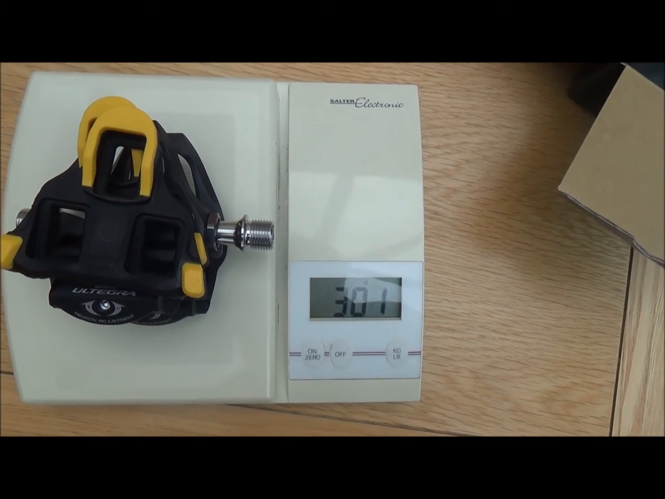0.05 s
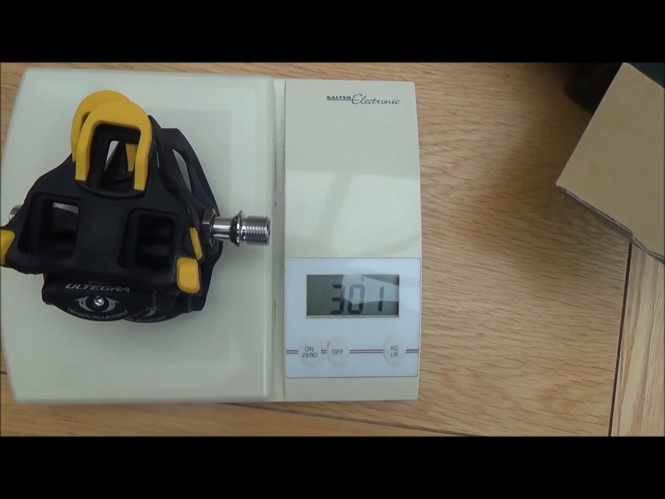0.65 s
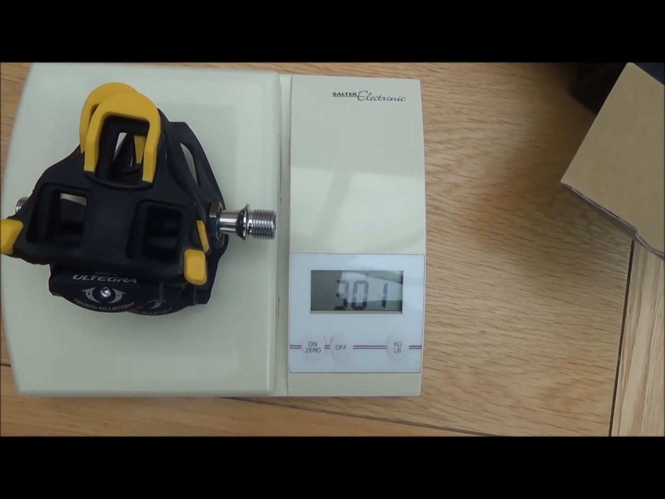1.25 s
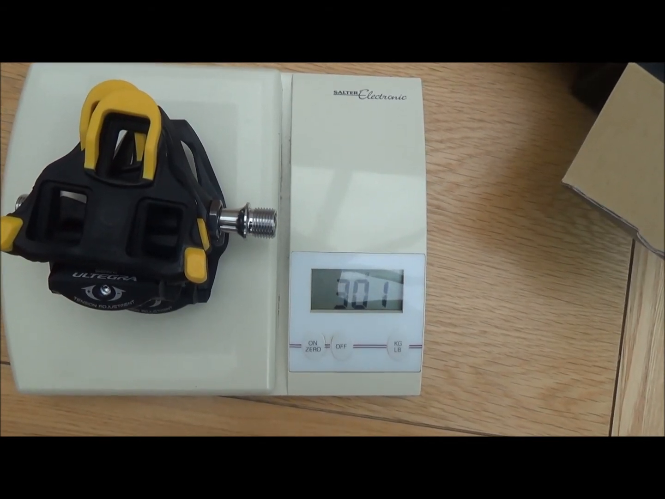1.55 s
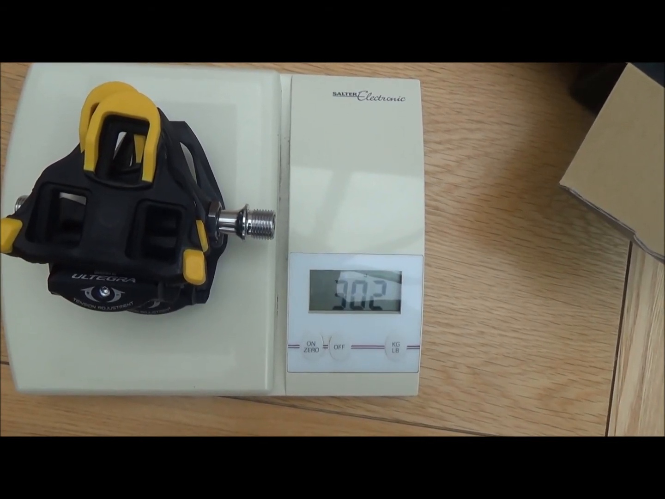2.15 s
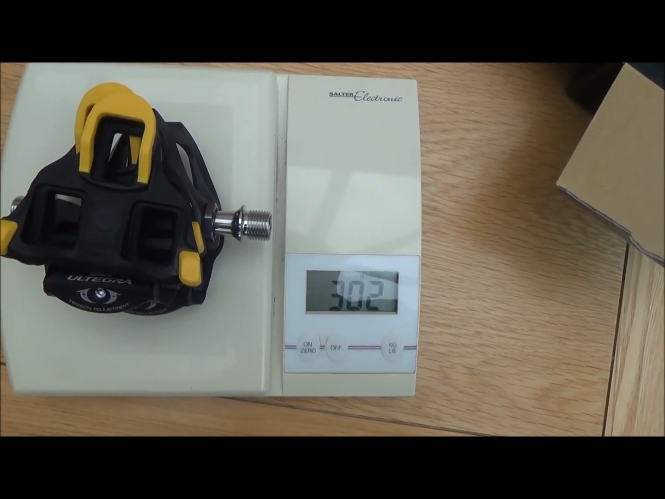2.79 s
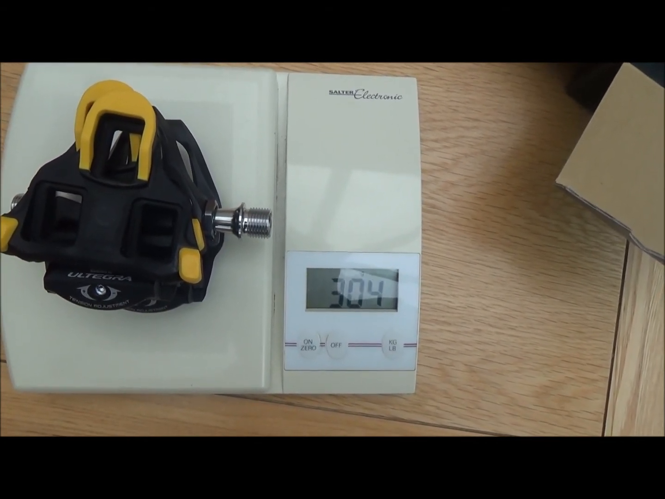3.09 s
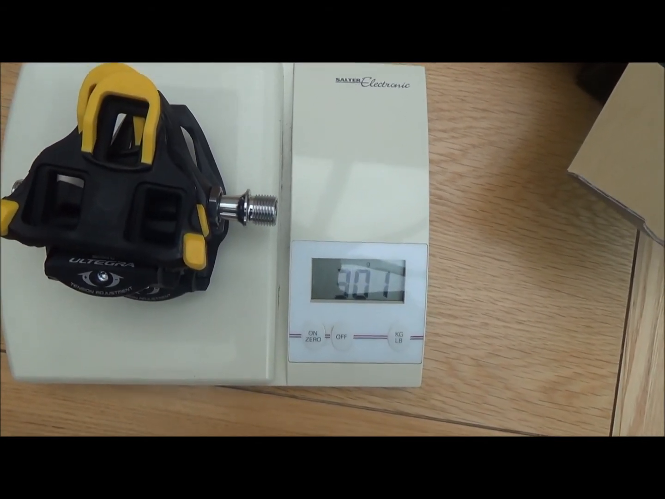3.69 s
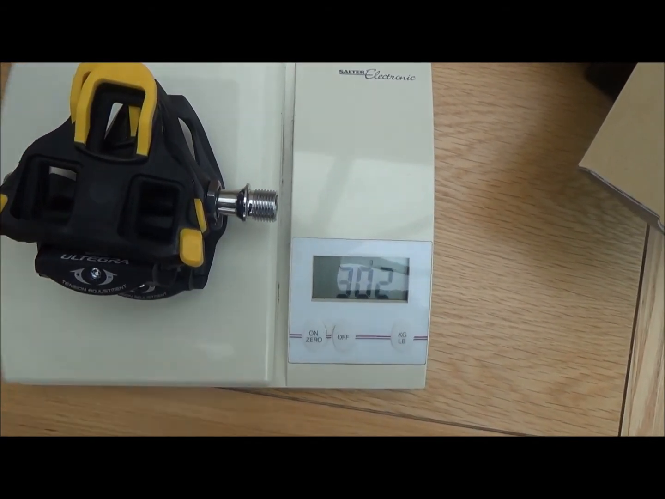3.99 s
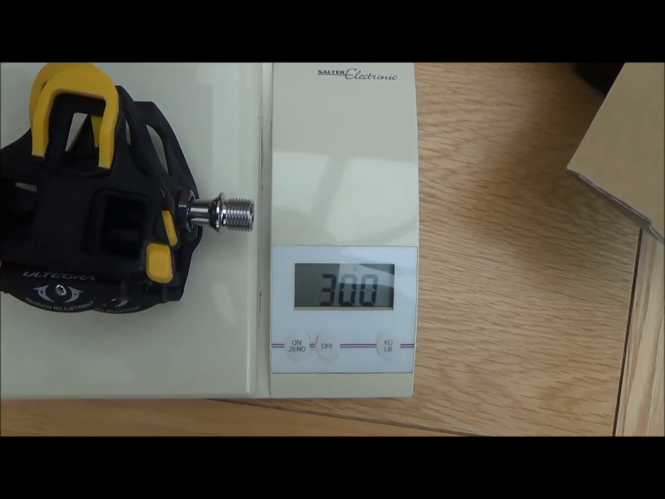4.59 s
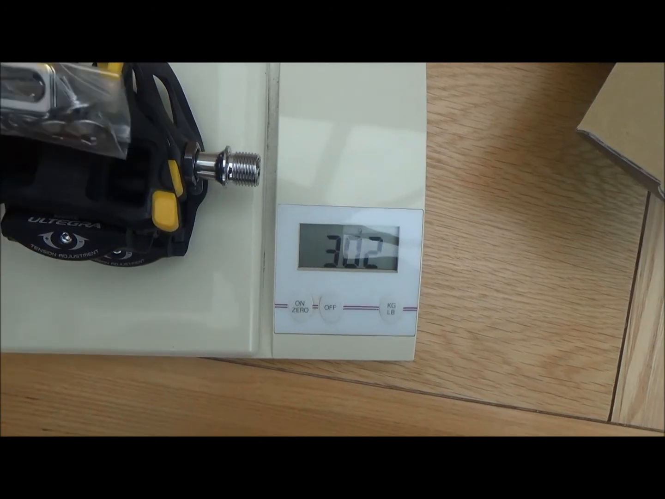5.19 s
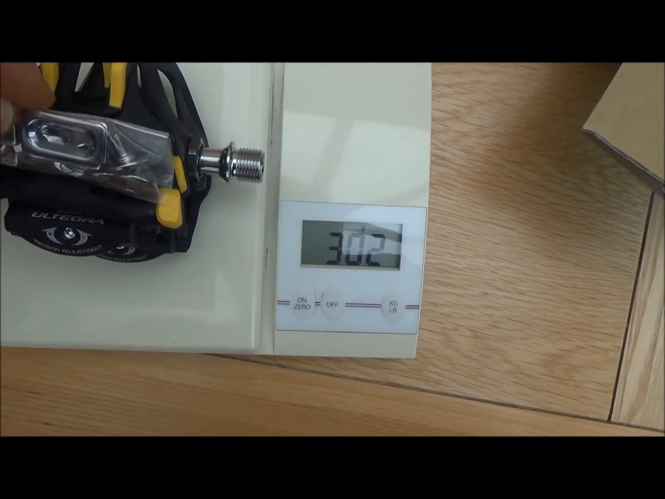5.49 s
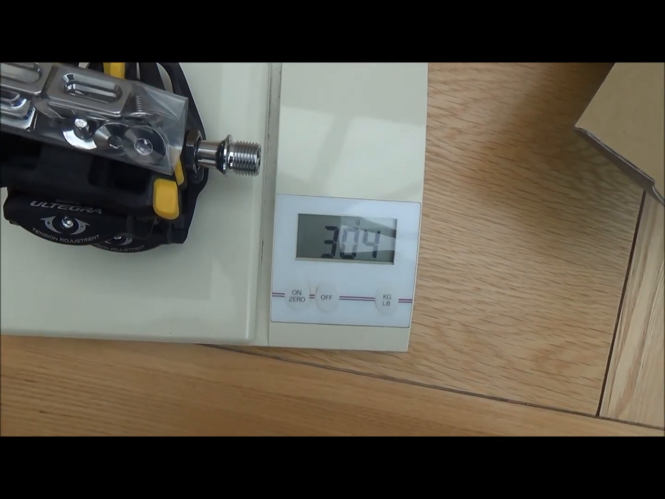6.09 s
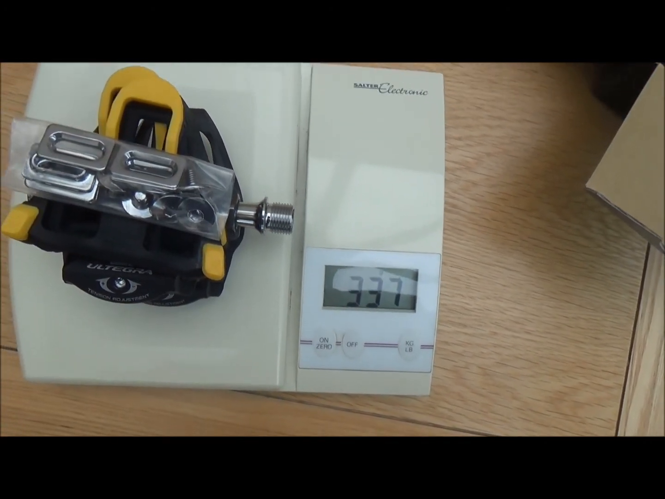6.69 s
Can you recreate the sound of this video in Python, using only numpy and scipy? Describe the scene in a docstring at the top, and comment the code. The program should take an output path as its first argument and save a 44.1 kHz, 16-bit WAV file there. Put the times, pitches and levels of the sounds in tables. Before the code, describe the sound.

Thin plastic rustles and snaps, then lands with light clinks and dull taps, amid camera handling knocks and low room noise.

```python
"""A packet of washers laid on a scale

A small plastic packet of metal cleat washers is lifted from a carton and laid on a pedal on a kitchen
scale. The film slides, snaps and crumples, the washers ring, and fingers rub and knock on the hand-held
camera. Behind is a quiet room with a thin electronic whistle, ducked by gain control after loud crackles."""
import sys
import numpy as np
from scipy import signal
from scipy.fft import rfft, irfft, next_fast_len
from scipy.io import wavfile
from scipy.ndimage import uniform_filter1d

SR = 44100
rng = np.random.default_rng(int(sys.argv[2]) if len(sys.argv) > 2 else 0)


def master_out(mix):
    """Clip the mix to full scale and print it as 16-bit PCM to the path in sys.argv[1]."""
    frames = np.transpose(np.atleast_2d(mix))
    ceiling = np.clip(frames, -1, 1)
    pcm = np.round(ceiling * 32767).astype(np.int16)
    wavfile.write(sys.argv[1], SR, pcm)


N = 302085
TIME = np.arange(N) / SR

# spectrum of rustling film: f/Hz, density/dB
FILM = [(410, -29), (700, -2.5), (1660, -9), (2660, -2.5), (3240, -11), (3690, -1.5), (5060, -6.5),
        (7990, -7), (10500, -3), (14200, -12), (15400, -21), (16000, -42)]
# film sliding under the fingers: start/s, end/s, relative level/dB, tilt/(dB per octave)
SLIDES = [(3.957, 4.34, -55, 1), (4.334, 4.473, -44, -2), (4.869, 5.02, -52, 5), (5.534, 5.62, -48, -3)]


def from_db(db):
    """Decibels to gain."""
    return 10 ** (np.asarray(db) / 20)


def rms_one(x):
    """Scale to unit power."""
    return x / np.sqrt(np.mean(x ** 2) + 1e-20)


def at_hz(points, hz):
    """Read a table on a log-frequency axis."""
    freqs, values = np.transpose(points)
    return np.interp(np.log(hz + 1e-3), np.log(freqs), values)


def cut(x, hz, kind, order=2):
    """Butterworth filter."""
    sos = signal.butter(order, np.clip(hz, 10, .45 * SR), kind, fs=SR, output="sos")
    return signal.sosfilt(sos, x + 1e-18)


def colour(x, spectrum, tilt_db=0):
    """Shape a noise by a spectrum and a tilt per octave, with steep skirts outside it; rms 1."""
    hz = np.fft.rfftfreq(x.shape[-1], 1 / SR) + 1
    inside = np.clip(hz, spectrum[0][0], spectrum[-1][0])
    skirt = np.minimum(hz / inside, inside / hz) ** 6
    shape = from_db(at_hz(spectrum, hz) + tilt_db * np.log2(inside))
    return rms_one(irfft(rfft(x) * skirt * shape, x.shape[-1]))


def diffuse(spectrum):
    """Stereo noise, alike at both microphone ports in the bass and widest in the upper mids."""
    # likeness of left and right: f/Hz, correlation
    likeness = [(50, .9999), (130, 0.99), (250, 1), (500, 0.84), (1000, .83), (2500, 0.36), (6000, 0.71),
                (14000, 1)]
    size = next_fast_len(N)
    mid, side = rfft(rng.standard_normal((2, size)))
    alike = np.clip(at_hz(likeness, np.fft.rfftfreq(size, 1 / SR)), 0, 1)
    stereo = np.sqrt(1 + alike) * mid + np.sqrt(1 - alike) * side * [[1], [-1]]
    return colour(irfft(stereo, size), spectrum)[:, :N]


def resonate(x, hz, width_hz):
    """Two-pole resonance with gain 1 on top."""
    r = np.exp(-np.pi * width_hz / SR)
    feedback = [1, -2 * r * np.cos(2 * np.pi * hz / SR), r * r]
    return signal.lfilter(np.array([1, 0, -1]) * (1 - r * r) / 2, feedback, x + 1e-18)


def dying(t60):
    """Half a second of exponential decay."""
    return np.exp(-np.log(1000) * TIME[:SR // 2] / t60)


def ring(hz, t60):
    """A struck mode."""
    return np.sin(2 * np.pi * hz * TIME[:SR // 2]) * dying(t60)


def burst(t60):
    """Noise that dies away."""
    return rng.standard_normal(SR // 2) * dying(t60)


def stroke(length, rise_s, fall_s):
    """One second holding an envelope that rises, holds and dies."""
    t = TIME[:SR]
    return (1 - np.exp(-t / rise_s)) * np.exp(-np.maximum(t - length, 0) / fall_s)


def grains(per_s, spread_db):
    """One second of tiny slips of uneven size; rms 1."""
    sizes = from_db(spread_db * np.minimum(rng.exponential(1, SR), 4)) * rng.choice([-1, 1], SR)
    return rms_one(sizes * (rng.random(SR) < per_s / SR))


def roughness(depth, below_hz):
    """A gain that flutters at random around 1."""
    return 1 + depth * rms_one(cut(rng.standard_normal(N), below_hz, "low"))


def add(track, s, sound):
    """Mix a sound in at a time."""
    start = int(np.clip(round(s * SR), 0, N - 1))
    track[start:start + len(sound)] += sound[:N - start]


def room_tone():
    """Low room rumble; a distant rush swells and fades in its mid range."""
    # rumble spectrum: f/Hz, density/dB
    spectrum = [(12, -44), (20, -7), (49, -1.5), (86, -6), (130, -2), (198, -4.5), (236, 0), (270, 0.5),
                (315, -4), (346, -5), (396, -10), (680, -11.5), (824, -5.5), (1190, -8.5), (2000, -18.5),
                (2600, -85), (4400, -120)]
    # swells of the rush: crest t/s, half width/s, rise/dB
    swells = [(2.4, 0.57, 2.5), (4.2, 0.55, 2)]
    rumble = from_db(-40) * diffuse(spectrum)
    rush = signal.sosfiltfilt(signal.butter(2, 500, "high", fs=SR, output="sos"), rumble)
    swell_db = sum(db * np.exp(-((TIME - s) / half_width) ** 2) for s, half_width, db in swells)
    return rumble + rush * (from_db(swell_db) - 1)


def hiss():
    """Steady microphone hiss."""
    # hiss spectrum: f/Hz, density/dB
    spectrum = [(1180, -46), (2000, 2), (4270, -6), (11800, -9.5), (14600, -12), (15000, -20.5)]
    return from_db(-50.5) * diffuse(spectrum)


def mains_hum(hz=49.5, rms_db=-52.5):
    """The mains hums on one low sine."""
    return from_db(rms_db) * np.sqrt(2) * np.sin(2 * np.pi * hz * TIME)


def whistle(hz=15625, dips_per_s=50, dip_half_width_s=.003, dip_depth=.75):
    """A thin, slightly rough electronic whistle whose level dips briefly at a steady rate."""
    from_dip_s = ((TIME * dips_per_s) % 1 - .5) / dips_per_s
    dips = 1 - dip_depth * np.exp(-(from_dip_s / dip_half_width_s) ** 2)
    tone = from_db(-55.5) * np.sqrt(2) * np.sin(2 * np.pi * hz * TIME)
    return tone * dips * roughness(depth=.33, below_hz=140)


def drones(fade_s=0.076, relative_width=0.047):
    """Low, wavering drones of narrow-band noise come and go."""
    # drones: start/s, end/s, f/Hz, rms level/dB
    spells = [(0.294, 0.682, 111.9, -51.5), (0.897, 1.50, 126, -47), (2.008, 2.346, 121, -52.5),
              (5.9, 6.297, 211.5, -41.5)]
    out = np.zeros(N)
    for start, end, hz, db in spells:
        fade = np.clip(np.minimum(TIME - start, end - TIME) / fade_s, 0, 1)
        width_hz = relative_width * hz
        band = resonate(rng.standard_normal(N), hz, width_hz)
        out += from_db(db) * fade * rms_one(resonate(band, hz, width_hz))
    return out


def camera_rubs():
    """Skin sticks and slips on the camera's shell; a firm press brings out its narrow resonances."""
    # finger rubs: start/s, end/s, level/dB, tilt/(dB per octave), shell ring/dB
    rubs = [(3.616, 3.659, -38, 0, -16), (3.666, 3.696, -33.5, -.5, 1), (6.452, 6.52, -45.5, -1.5, -10.5),
            (6.519, 6.60, -39, -2, -12)]
    # skin friction spectrum: f/Hz, density/dB
    skin = [(88, -40), (150, -31), (232, 1), (418, -21.5), (600, -3.5), (1330, -10.5), (2630, -9),
            (3500, -17.5), (8550, -16.5), (14000, -27)]
    # shell resonances: f/Hz, width/Hz, gain/dB
    resonances = [(590, 52, -5), (2020, 91, -16), (2970, 120, -1), (4640, 70, 13), (4890, 76, 3),
                  (8600, 90, 6)]
    out = np.zeros(N)
    for start, end, level_db, tilt_db, ring_db in rubs:
        friction = colour(grains(per_s=7000, spread_db=2.0), skin, tilt_db)
        shell = sum(from_db(db + ring_db) * resonate(friction, hz, width) for hz, width, db in resonances)
        envelope = stroke(end - start, rise_s=0.0019, fall_s=0.0061)
        add(out, start, from_db(level_db) * rms_one(friction + shell) * envelope)
    return out


def knocks(blows, modes, thud_db, thud_t60):
    """Each blow rings the body's modes over a dense thud; a soft contact leaves out the highs."""
    out = np.zeros(N)
    for s, level_db, contact_hz in blows:
        body = sum((-1) ** k * from_db(db) * ring(hz, t60) for k, (hz, db, t60) in enumerate(modes))
        thud = from_db(thud_db) * cut(burst(thud_t60), [170, 3000], "band")
        add(out, s, from_db(level_db) * cut(body + thud, contact_hz, "low"))
    return out


def camera_knocks():
    """Fingers knock on the camera and ring its body."""
    # finger knocks: t/s, relative level/dB, contact cutoff/Hz
    blows = [(3.620, -37.5, 6000), (3.659, -31, 1100), (3.679, -40, 900), (6.318, -23.5, 330),
             (6.378, -34.5, 800), (6.563, -29, 700), (6.8277, -16.5, 3900), (6.8313, -19.5, 2400)]
    # camera modes: f/Hz, level/dB, t60/s
    modes = [(167, -6, 0.066), (270, -1.5, 0.069), (463, 1.5, 0.038), (623, -8.5, 0.34), (1070, -4, 0.02),
             (1610, 5, 0.0096), (2035, 2.5, 0.027), (2260, -5, 0.022), (2550, 1, .03), (3040, -8, 0.028),
             (4410, -15, .03)]
    return knocks(blows, modes, thud_db=17, thud_t60=0.023)


def film_slides(edge_s=.014):
    """Sliding film gives a soft, even hiss of tiny slips."""
    out = np.zeros(N)
    for start, end, level_db, tilt_db in SLIDES:
        slips = colour(grains(per_s=4600, spread_db=1.5), FILM, tilt_db)
        add(out, start, from_db(level_db) * slips * stroke(end - start, edge_s, edge_s))
    return out


def small_creases(count=12, reference_db=-40.5, over_slide_db=20, ring_hz=4000):
    """Sliding sets off faint snaps, more often the firmer it is; rows of t/s, level/dB, f/Hz."""
    rows = []
    for start, end, level_db, _ in SLIDES:
        gaps = rng.uniform(0.98, 1.4, count)
        levels_db = level_db + over_slide_db + rng.normal(0, 4.3, count)
        pitches = ring_hz * rng.uniform(.8, 1.2, count)
        pace = 35 * from_db(level_db - reference_db)
        times = start + (np.cumsum(gaps) - gaps[0] / 2) / pace
        rows += [(s, db, hz) for s, db, hz in zip(times, levels_db, pitches) if s < end]
    return rows


def film_snaps(pop_t60=0.00072, crack_ceiling_db=-16, rebound_s=0.00206):
    """A crease buckles with a sharp pop and a bright crack; the sheet around it rings briefly."""
    # the clearest creases snapping over: t/s, relative level/dB, ring f/Hz
    creases = [(4.361, -27, 3530), (4.402, -15, 2640), (4.473, 3, 3730), (4.4972, -6, 3400),
               (4.5221, 1, 3980), (4.553, -5, 3020), (4.6095, -10.5, 2900), (4.6302, -9, 3280),
               (4.6375, -1.5, 3800), (4.643, 4.5, 3040), (4.649, -4, 3260), (4.883, -25.5, 4500),
               (5.270, -28, 3920), (5.289, -28, 3900), (5.3223, -22.5, 3370), (5.33, -26, 2570),
               (5.4855, -28, 3730), (5.5953, -15.5, 3920), (5.650, -11, 4630), (5.7413, 0, 4530),
               (5.774, 0, 3830)]
    # modes of a buckled patch of film: multiple of the ring frequency, level/dB
    modes = [(.6, -6.5), (.76, -30), (.97, -1.5), (1.2, -3), (1.5, -10.5), (1.85, -6)]
    out = np.zeros(N)
    build_up = 1 - np.exp(-TIME[:SR // 2] / 0.00046)   # the sheet takes up the motion
    for s, level_db, hz in creases + small_creases():
        sheet = sum(from_db(db) * ring(hz * ratio * rng.uniform(0.953, 1.04), t60=0.0085)
                    for ratio, db in modes)
        crack_db = min(-12, crack_ceiling_db - level_db)   # grows with the pop only up to a ceiling
        crack = from_db(crack_db) * cut(burst(t60=0.011), [5500, 12500], "band")
        flutter = from_db(-31) * cut(burst(t60=0.12), [1400, 7000], "band")
        snap = ring(hz, pop_t60) + from_db(-9) * sheet * build_up + crack + flutter
        add(out, s, from_db(level_db) * snap)
        rebound = from_db(level_db - 7.5) * ring(hz / 2, 2 * pop_t60)   # a weaker, lower pop
        add(out, s + rebound_s * rng.uniform(.7, 1.29), rebound)
    return cut(out, 2160, "high", order=3)


def washer_clinks(held_contact_hz=8000, free_contact_hz=18000):
    """The washers ring high; the freer they lie, the harder the contact and the longer the ring."""
    # washers touching: t/s, relative level/dB, share of the free ring time (small while held)
    touches = [(4.348, -32, .16), (4.455, -26, 0.14), (4.517, -4, .08), (5.544, -38, .15),
               (5.637, -30, 0.19), (5.761, -22.5, 0.7), (5.771, -24, 0.72)]
    # modes of the free washers: f/Hz, level/dB, t60/s
    modes = [(3380, -31, 0.095), (10570, -2, 0.3), (10730, -7, 0.23), (11000, -1, 0.08), (14200, -25, 0.17),
             (15080, -1, 0.13)]
    out = np.zeros(N)
    for s, level_db, freedom in touches:
        contact_hz = held_contact_hz + freedom * (free_contact_hz - held_contact_hz)
        metal = sum(from_db(db + rng.normal(0, 2.8)) * ring(hz * rng.normal(1, 0.0023), t60 * freedom)
                    for hz, db, t60 in modes)
        add(out, s, from_db(level_db) * cut(metal, contact_hz, "low"))
    return out * roughness(depth=0.28, below_hz=130)   # chatter against the film


def film_crumples(sag_db_per_s=108):
    """Crumpling film sheds thousands of tiny snaps a second, hardest at first, weaker as it gives way."""
    # the packet gripped or let go: start/s, end/s, relative level/dB, tilt/(dB per octave)
    grips = [(4.472, 4.595, -24.5, -1.5), (4.497, 4.526, -15.5, 1), (4.624, 4.654, -14, 1.5),
             (5.621, 5.642, -29, 0.5), (5.746, 5.808, -24, 2)]
    out = np.zeros(N)
    sag = from_db(-sag_db_per_s * TIME[:SR])
    for start, end, level_db, tilt_db in grips:
        crackle = colour(grains(per_s=4000, spread_db=5.0), FILM, tilt_db)
        envelope = sag * stroke(end - start, rise_s=0.002, fall_s=.0022)
        add(out, start, from_db(level_db) * crackle * envelope)
    return out


def carton_bumps():
    """The packet bumps the carton as it is lifted: short, boxy knocks."""
    # bumps: t/s, relative level/dB, contact cutoff/Hz
    blows = [(4.498, -22, 2500), (4.514, -15, 1700), (4.5222, -11.5, 5000), (4.552, -27, 2500),
             (4.609, -32.5, 2500)]
    # carton modes: f/Hz, level/dB, t60/s
    modes = [(207, -15, 0.12), (250, -20, 0.11), (282, -11, .2), (351, -11.5, 0.068), (638, -7, 0.091),
             (685, 0, 0.061), (850, 2, 0.017), (1290, 3, 0.017), (1447, 0.5, 0.023), (1800, 1.5, 0.021),
             (2630, -4, 0.036)]
    return knocks(blows, modes, thud_db=10.5, thud_t60=0.027)


def scale_bumps():
    """The packet settles on the pedal and scale, which answer with dull, low knocks."""
    # landings: t/s, relative level/dB, contact cutoff/Hz
    blows = [(5.630, -41.5, 1200), (5.757, -34, 1790), (5.773, -29.5, 1450), (5.803, -24.5, 222)]
    # modes of the pedal and scale: f/Hz, level/dB, t60/s
    modes = [(138.3, -3, 0.38), (233, -12, 0.12), (340, 3.5, 0.075), (582, 4.5, 0.088), (716, 0.5, 0.19),
             (980, 3, 0.043), (1260, -33, .04)]
    return knocks(blows, modes, thud_db=15.5, thud_t60=0.034)


def panned(x, pan_db):
    """Place a sound between the two ports by a left-minus-right level."""
    return x * from_db(pan_db * np.array([[.5], [-.5]]))


def echoes(x):
    """Nearby surfaces add at one port and take away at the other; long waves reach both alike."""
    # early echoes off the scale, floor and carton: delay/s, level/dB
    reflections = [(.0007, -46), (.0019, -26), (.0043, -13.5)]
    highs = cut(x, 1000, "high", order=1)
    side = sum(from_db(db) * np.interp(TIME - delay, TIME, highs, left=0) for delay, db in reflections)
    return side * np.array([[1], [-1]])


def reverberate(x, low_t60=0.3, treble_t60=0.25):
    """The room's tail, different at each port and shorter in the treble."""
    tails = [cut(burst(low_t60), 3400, "low") + from_db(-1.5) * cut(burst(treble_t60), 3500, "high")
             for side in range(2)]
    tails = np.array(tails) * np.minimum(TIME[:SR // 2] / 0.0018, 1)
    tails = tails + .5 * tails[::-1]   # the ports sit close together
    tails = tails / np.sqrt(np.sum(tails ** 2) / 2)
    return signal.fftconvolve(x[None], tails, axes=1)[:, :N]


def gain_control(x, threshold_db=-29, slope=0.21, release_db_per_s=1.53):
    """Loud moments turn the camera's gain down at once; it creeps back over seconds."""
    power = uniform_filter1d(np.mean(x ** 2, axis=0), size=300)
    level_db = 10 * np.log10(np.maximum(power, 1e-12))
    duck_db = slope * np.maximum(level_db - threshold_db, 0)
    recovery_db = release_db_per_s * TIME
    held_db = np.maximum.accumulate(duck_db + recovery_db) - recovery_db
    return x * from_db(-held_db)


def scene():
    """The packet and the camera's handling noise in a small reverb, over the quiet background."""
    # the packet moves left on its way to the pedal: t/s, left minus right/dB
    path = [(4.6, -0.3), (5.6, 2.2)]
    ambience = room_tone() + hiss() + mains_hum() + whistle() + drones()
    camera = camera_rubs() + camera_knocks()
    bumps = carton_bumps() + scale_bumps()
    rustle = from_db(0.5) * (film_crumples() + film_slides())
    packet = bumps + rustle + from_db(1.0) * washer_clinks() + from_db(4.5) * film_snaps()
    direct = panned(packet, np.interp(TIME, *np.transpose(path))) + panned(camera, pan_db=1.5)
    reverb = from_db(-11) * reverberate(packet + from_db(2.5) * camera)
    # crackles come from all over the packet, so part of them differs between the ports
    spread = from_db(-19) * film_crumples() * np.array([[1], [-1]])
    return direct + spread + echoes(packet + camera) + reverb + ambience


def record(dry):
    """Gain control, full-scale clipping and a steep top cut."""
    clipped = np.clip(gain_control(dry), -1, 1)
    top_cut = signal.ellip(10, .1, 80, 16300, fs=SR, output="sos")
    return signal.sosfilt(top_cut, clipped)


dry = scene()
out = record(dry)
master_out(out)
```